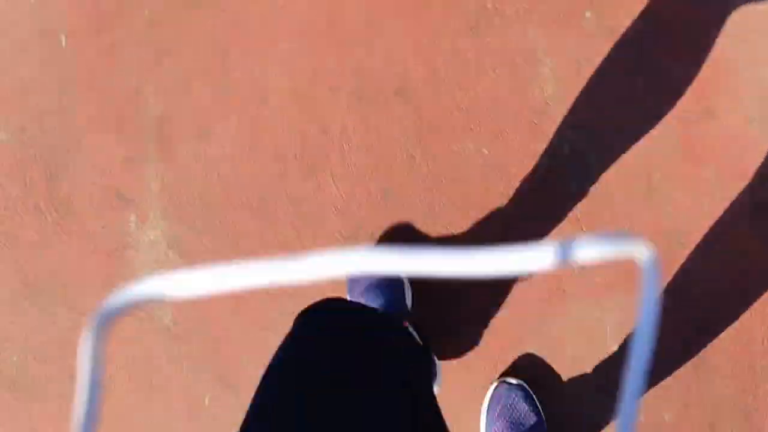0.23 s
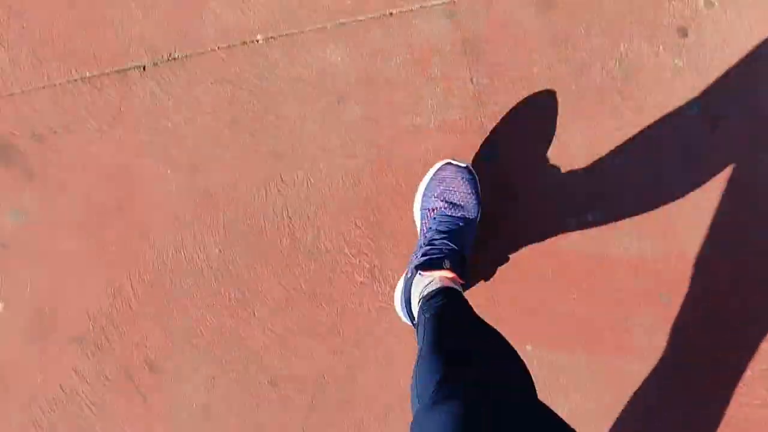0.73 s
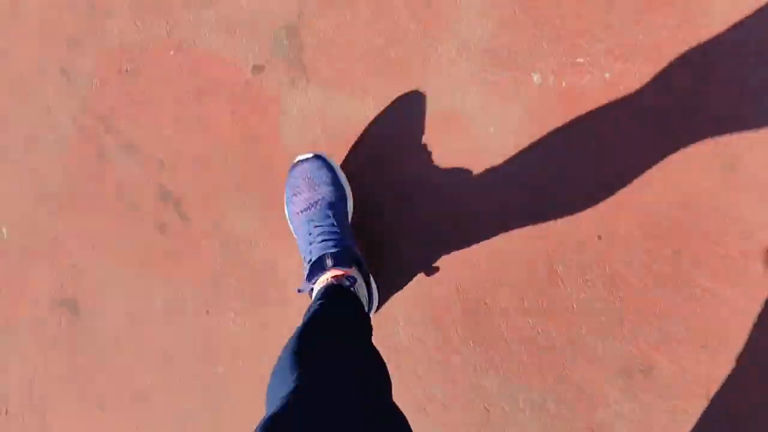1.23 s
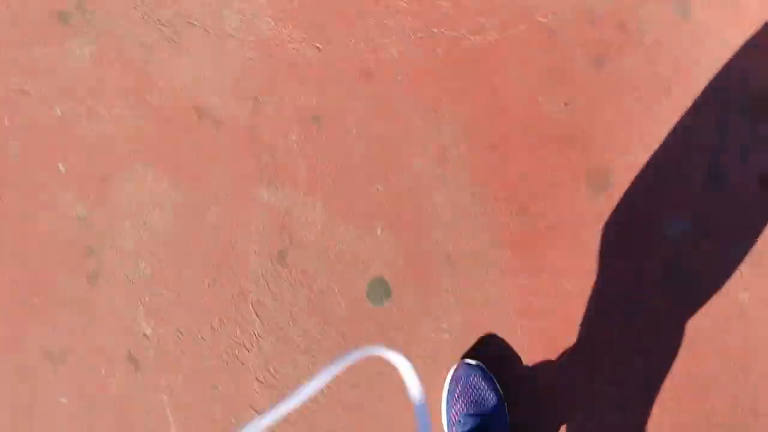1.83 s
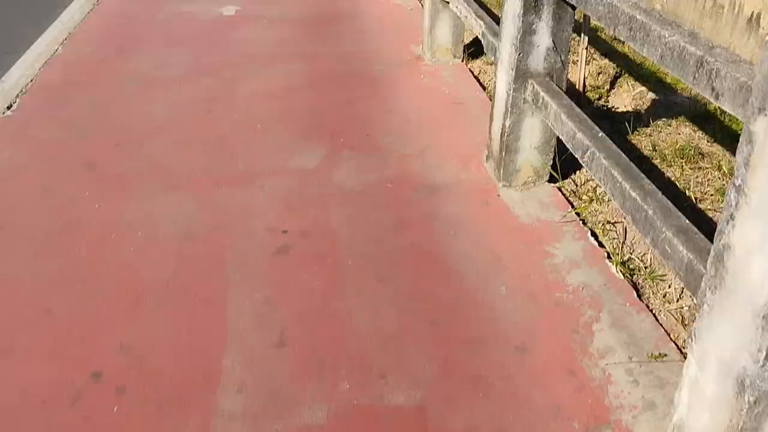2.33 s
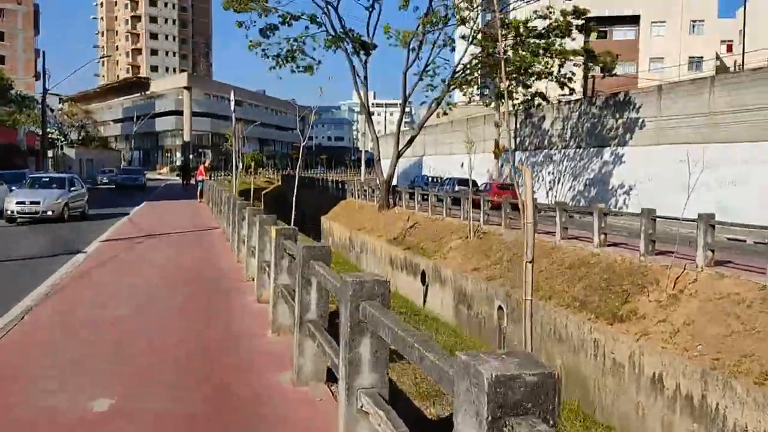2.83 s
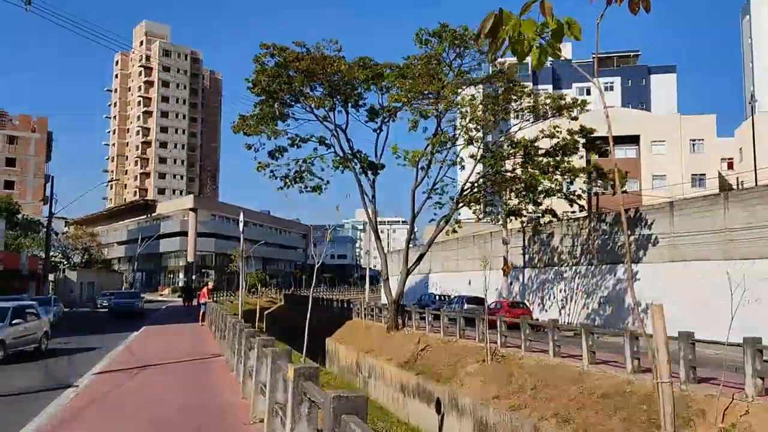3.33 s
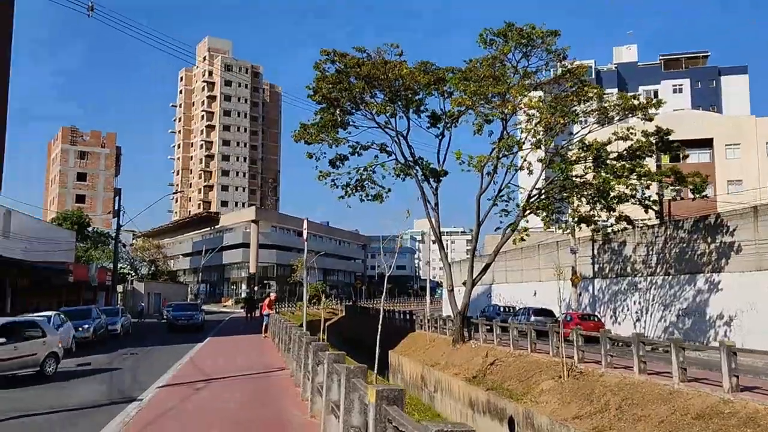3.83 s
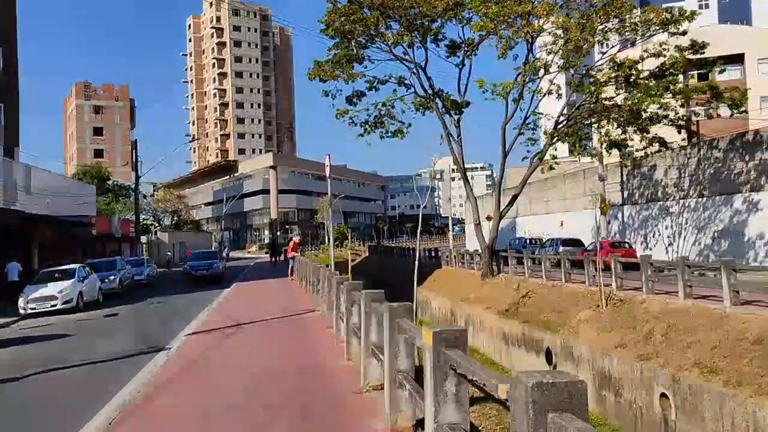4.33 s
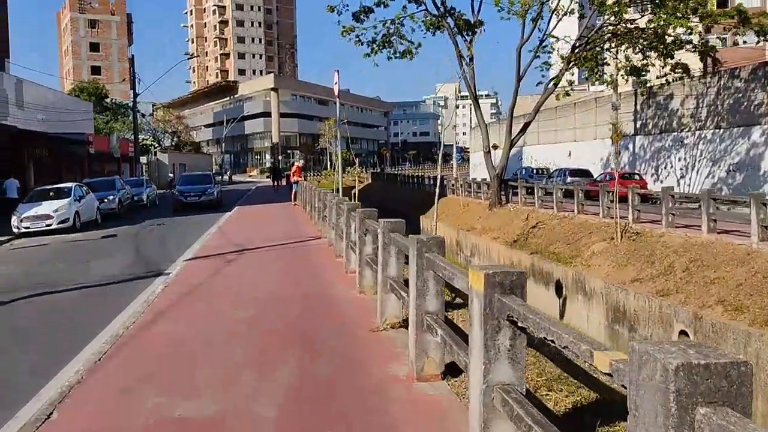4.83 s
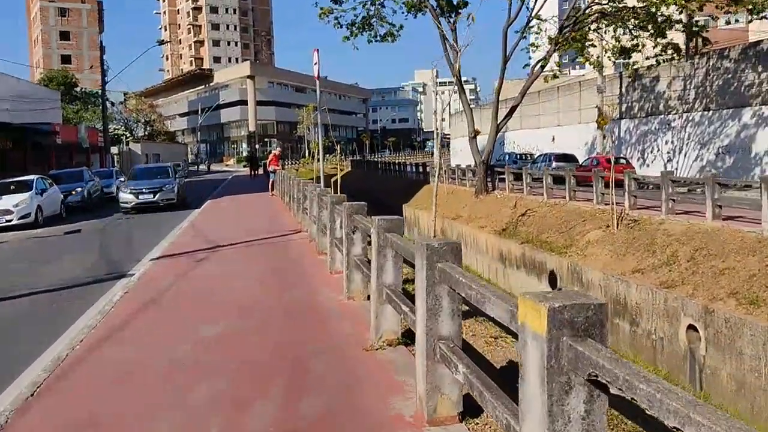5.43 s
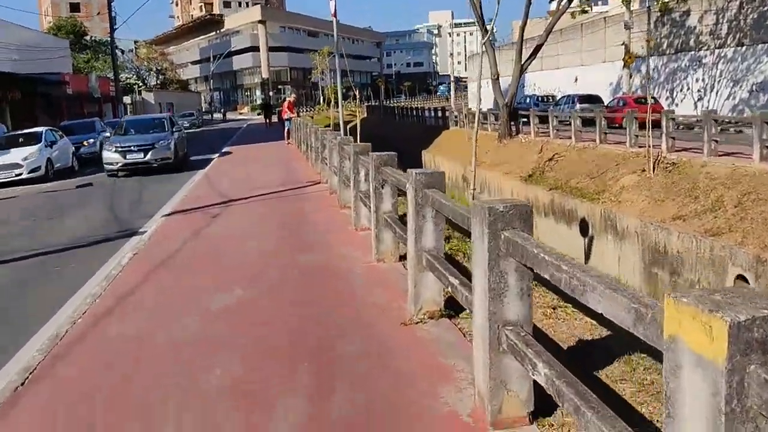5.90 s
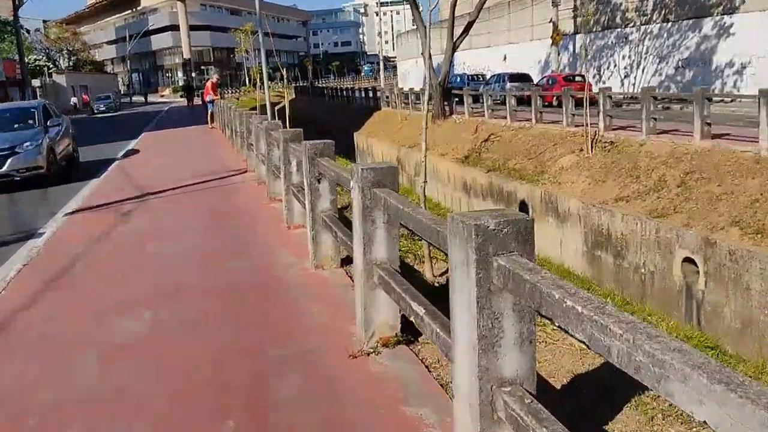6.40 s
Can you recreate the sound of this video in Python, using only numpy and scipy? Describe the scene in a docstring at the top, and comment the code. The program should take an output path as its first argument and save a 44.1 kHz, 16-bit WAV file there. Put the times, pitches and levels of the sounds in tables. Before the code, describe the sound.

Close, dry cloth rubs and tiny cord ticks sit over soft low wind and distant tyre hiss. Hurried bird chirps open the scene, then brief squeaks, dry clicks and a faint shoe scrape. A small metal piece rings once clearly; dull finger taps follow midway. Passing motors hum louder toward the end, joined by a pulsing, brake-like hoot echoing faintly off buildings. Single-channel handheld pickup outdoors.

```python
"""Light wind and distant traffic rumble under a rustle of clothes: a walk, phone in hand, on a paved path.
A bird twitters as gliding sines; a dangling cord ticks as short noise decays; far squeaks waver.
A small metal part rings, folds snap, dry clicks crackle, soles scuff as band noise, fingers bump the case.
Engine sines swell, loudest near the end, where a throbbing hoot, perhaps a brake, joins in.
Wind is coloured noise with pressure dips; sparse random taps echo the house fronts."""
import sys
import numpy as np
from scipy import signal
from scipy.fft import rfft, irfft
from scipy.io import wavfile
from scipy.ndimage import uniform_filter1d

SR = 44100
rng = np.random.default_rng(int(sys.argv[2]) if len(sys.argv) > 2 else 0)


def wav_record(signal):
    """Record a signal, one row per channel, as 16-bit PCM in the file named by sys.argv[1]."""
    frames = np.transpose(np.atleast_2d(signal))
    bounded = np.clip(frames, -1, 1)
    # unit amplitude maps onto the largest positive 16-bit level
    quanta = np.round(bounded * 32767).astype(np.int16)
    wavfile.write(sys.argv[1], SR, quanta)


N = 293706
TIME_S = np.arange(N) / SR

# Arm swing and stride
SWAY_DB, STRIDE_HZ = -19.3, 2.25
# Wind swells: (time [s], level before gain [dB])
WIND_LEVELS = [(0.05, -44), (0.17, -46.5), (0.3, -56), (0.66, -50), (0.85, -44), (0.99, -51), (1.1, -39),
               (1.22, -52), (1.44, -48), (1.6, -48.5), (1.9, -47), (2.03, -52), (2.2, -42), (2.43, -54),
               (2.6, -44.5), (2.82, -51), (3.07, -39), (3.3, -49), (3.66, -45.5), (3.98, -56), (4.15, -45),
               (4.34, -51), (4.5, -46.5), (4.68, -62), (4.85, -46), (5.0, -55), (5.2, -50), (5.5, -44),
               (5.7, -55), (5.87, -47), (6.15, -53), (6.6, -40.5)]
# Wind spectrum: (frequency [Hz], relative density [dB per Hz])
WIND_SPECTRUM = [(20, -6.5), (33, 3), (48, 2.5), (70, -1.5), (100, -10.5), (135, -15.5), (180, -20),
                 (400, -30)]
# Strongest eddies at the microphone port: (time [s], width [s], peak [dB])
EDDIES = [(0.818, 0.0028, -25), (0.829, 0.0024, -26), (0.853, 0.0035, -24), (0.867, 0.0014, -35),
          (0.9087, 0.003, -22.5), (1.084, 0.0026, -31), (1.132, 0.0027, -30.5), (2.918, 0.0031, -29.5),
          (3.048, 0.005, -37), (3.104, 0.004, -34), (3.193, 0.007, -33)]
# Road: (time [s], rumble before gain [dB], tyre hiss before gain [dB])
ROAD_LEVELS = [(0.05, -56.5, -56), (0.88, -56.5, -57), (1.22, -54.5, -55), (1.95, -57, -57),
               (2.6, -55.5, -55.5), (3.27, -55.5, -56), (3.7, -55.5, -54), (4.34, -55.5, -56.5),
               (4.9, -55.5, -54.5), (5.28, -53.5, -54.5), (5.78, -53.5, -52.5), (6.25, -50, -51),
               (6.45, -53.5, -50), (6.6, -47, -51.5)]
# Road rumble, tyres, distant motors, microphone hiss: (frequency [Hz], relative density [dB per Hz])
RUMBLE_SPECTRUM = [(130, -1), (220, -0.5), (350, -2), (550, -3.5), (680, -6), (830, -5.5), (1000, -7.5),
                   (1400, -10), (2200, -35)]
TYRE_SPECTRUM = [(1000, -16), (1300, -2.5), (1700, 7), (2100, 4.5), (2450, 3), (2800, -0.5), (3300, -4.5),
                 (4200, -11.5), (5400, -14), (6300, -22.5), (9000, -30)]
DRONE_SPECTRUM = [(50, -11), (65, -1.5), (95, -0.5), (135, -4.5), (180, -11)]
HISS_SPECTRUM = [(4000, -4), (7000, -0.5), (8000, -4), (9500, 3), (10300, -2), (12400, -1), (13600, 0),
                 (15500, 4)]
DRONE_DB, HISS_DB = -49.5, -69
# Engines: (loudest time [s], time from peak to 1/e [s], firing rate [Hz], peak level [dB])
ENGINE_PASSES = [(1.105, 0.86, 83.9, -63), (4.704, 0.41, 69.9, -45), (5.143, 0.45, 93.2, -51.5),
                 (6.278, 0.6, 54.2, -42.5)]
# Clothes rub as the legs pass: (start [s], nominal length [s], fizz [dB], body [dB])
CLOTH_RUBS = [(0.04, 0.029, -50.5, -45), (0.466, 0.1, -61, -59.5), (0.658, 0.024, -60.5, -55),
              (0.913, 0.031, -60, -56), (0.941, 0.023, -52, -47), (1.32, 0.014, -56, -48),
              (1.384, 0.077, -60, -58), (1.558, 0.028, -59, -59), (1.804, 0.054, -58, -52),
              (2.204, 0.022, -58.5, -56), (2.276, 0.071, -57.5, -50), (2.43, 0.03, -58, -56),
              (2.692, 0.03, -54, -48.5), (3.045, 0.046, -58, -53.5), (3.139, 0.085, -54.5, -48.5),
              (3.578, 0.065, -65.5, -56.5), (3.966, 0.033, -54, -55.5), (4.037, 0.035, -68, -67),
              (4.062, 0.064, -53.5, -49.5), (4.2, 0.016, -57.5, -52.5), (4.456, 0.04, -62, -60),
              (4.481, 0.027, -55.5, -47), (4.863, 0.031, -53.5, -55.5), (4.946, 0.077, -56, -56),
              (5.106, 0.012, -56.5, -52), (5.352, 0.032, -69, -64), (5.377, 0.039, -57.5, -49),
              (5.748, 0.035, -49.5, -48), (5.829, 0.045, -53, -49.5), (5.879, 0.025, -52.5, -53.5),
              (5.984, 0.027, -57, -71), (6.256, 0.045, -54.5, -51), (6.62, 0.047, -48.5, -46.5)]
# Cloth treble fizz and darker body: (frequency [Hz], relative density [dB per Hz])
FIZZ_SPECTRUM = [(4200, -29), (5400, -22), (6400, -8), (7700, -7), (8300, -0.5), (8750, -8.5), (9200, -1),
                 (10200, -9.5), (11200, 0), (12400, 2.5), (14000, -1), (15700, -1)]
BODY_SPECTRUM = [(1200, -6), (1950, -14), (2400, 10), (2900, -1), (3500, -1), (4300, -23), (5400, -4.5),
                 (6400, -49), (8400, -14.5), (10000, -18)]
# Bird notes: (start [s], length [s], first pitch [Hz], last pitch [Hz], level before gain [dB])
BIRD_NOTES = [(0.197, 0.024, 4100, 3560, -58), (0.205, 0.02, 3030, 2870, -53),
              (0.253, 0.03, 3140, 2650, -52), (0.282, 0.053, 3260, 2480, -50),
              (0.328, 0.016, 3500, 4800, -62), (0.345, 0.02, 5100, 3430, -55.5),
              (0.36, 0.021, 3550, 3270, -57.5), (0.393, 0.016, 5270, 3600, -57),
              (0.407, 0.028, 3480, 2830, -54), (0.455, 0.0375, 3290, 2560, -54),
              (0.466, 0.012, 3520, 5000, -61), (0.485, 0.026, 5100, 3330, -56),
              (0.495, 0.021, 3550, 3240, -53), (0.53, 0.016, 3070, 4200, -56),
              (0.573, 0.021, 3510, 2940, -53), (0.617, 0.0166, 4820, 3470, -54),
              (0.625, 0.021, 3600, 3230, -54), (0.658, 0.016, 4700, 3380, -61),
              (0.67, 0.021, 3640, 3050, -54), (0.71, 0.042, 3380, 2800, -52),
              (0.745, 0.025, 5170, 3280, -56), (0.825, 0.03, 3060, 2540, -51.5),
              (0.874, 0.027, 3020, 2590, -56)]
FLICK_ABOVE_HZ = 4400
# Cord ticks on the clothes: (time [s], relative level [dB])
CORD_TICKS = [(0.343, -37), (0.383, -40), (0.39, -34), (0.478, -34), (0.9457, -37), (1.3284, -28),
              (1.532, -38), (2.2089, -35), (2.577, -32), (2.6963, -28.5), (3.128, -40), (3.144, -31),
              (3.367, -43), (3.4107, -27), (3.478, -37), (3.561, -43), (3.949, -49), (4.4852, -31),
              (4.9796, -26), (5.7195, -30), (5.8341, -29), (5.958, -40)]
# Cord drags: (start [s], length [s], relative level [dB])
CORD_DRAGS = [(0.34, 0.14, -57.5), (0.48, 0.082, -60), (1.225, 0.072, -52), (2.49, 0.11, -57.5),
              (3.35, 0.14, -58), (4.77, 0.09, -60), (5.22, 0.083, -55.5)]
# Resonances colouring the cord noise: (frequency [Hz], relative gain [dB], t60 [s])
CORD_MODES = [(8800, -17, 0.0041), (12000, -6, 0.0017), (12480, 0, 0.004), (14200, -3, 0.0029),
              (14500, -4, 0.0056)]
# Far squeaks: (start [s], length [s], mid pitch [Hz], glide [Hz/s], direct level [dB])
FAR_SQUEAKS = [(1.012, 0.021, 1395, 0, -58), (1.2, 0.062, 1385, -450, -51),
               (1.052, 0.065, 1600, 996, -53.5), (1.03, 0.025, 2000, -500, -55),
               (0.72, 0.038, 2350, -500, -56), (1.4, 0.026, 2080, -400, -50),
               (1.185, 0.045, 1600, -400, -57), (1.212, 0.025, 1900, 398, -55)]
# Small metal piece, like a zip pull: (time [s], relative level [dB])
METAL_CLINKS = [(0.9455, -51), (2.269, -34.5), (4.495, -55)]
# Its modes, then a close pair that lingers: (frequency [Hz], relative gain [dB], t60 [s])
METAL_MODES = [(2200, -4, 0.05), (2430, 2, 0.03), (2540, 2, 0.025), (2704, 8.5, 0.062), (2930, -3, 0.03),
               (3370, -8, .02), (5020, -10.5, 0.04), (5600, -9, .02)]
METAL_TAIL = [(2699, -17, .9), (2683, -25, .9)]
# Cloth folds snap: (time [s], relative level [dB])
FOLD_SNAPS = [(0.947, -36.5), (2.7005, -37.5), (4.094, -38), (4.11, -39), (4.122, -38), (4.499, -40),
              (5.112, -50), (5.762, -39), (5.857, -38), (6.279, -35)]
# Fold resonances: (frequency [Hz], relative gain [dB], t60 [s])
FOLD_MODES = [(2355, 3.5, 0.012), (2585, -1.5, 0.017), (2900, -2, 0.011), (3540, -6.5, 0.0069),
              (5400, -11, 0.011)]
# Dry clicks: (time [s], impulse level before band-pass [dB])
DRY_CLICKS = [(0.978, -33), (0.996, -33), (1.005, -34), (1.016, -33), (1.0305, -32), (1.047, -34),
              (1.1, -34), (1.864, -39), (1.873, -41), (1.884, -29), (1.902, -35), (1.912, -36),
              (1.922, -39)]
# Sole scuffs: (start [s], length [s], centre [Hz], width [octaves], level [dB])
SOLE_SCUFFS = [(1.026, 0.33, 1990, 0.53, -56), (1.163, 0.068, 2040, 1.3, -52.5),
               (1.666, 0.069, 2080, 0.56, -55), (2.09, 0.045, 2800, 0.99, -53),
               (3.604, 0.17, 2070, 0.83, -56.5), (3.692, 0.0143, 1790, 0.5, -44),
               (3.716, 0.015, 2150, 0.77, -52), (5.647, 0.018, 3850, 0.85, -57.5)]
# Finger bumps: (time before lag [s], peak before gain [dB])
FINGER_BUMPS = [(3.402, -32), (3.443, -39.5), (3.479, -39.5), (3.557, -35.5), (3.627, -30.5),
                (3.705, -37.5), (3.836, -39), (3.872, -37)]
# Hoots: (start [s], length [s], base pitch at start [Hz], base level at start [dB])
HOOT_NOTES = [(6.25, 0.19, 547, -39), (6.481, 0.084, 540.5, -42), (6.613, 0.0213, 535, -45)]
# Hoot partials: (frequency multiple [ratio], relative level [dB])
HOOT_HARMONICS = [(1, -2.5), (2, -20), (3, -16.5)]
THROB_HZ, THROB_DB, THROB_BEND_RATIO = 18.5, 4, 0.034
HOOT_FADE_DB_PER_S, HOOT_RISE_HZ_PER_S = 17, 131
# House-front echoes
STREET_DELAY_S, STREET_T60_S, STREET_ECHOES_PER_S = 0.026, 0.42, 200
CUTOFF_HZ = 16000


def from_db(db):
    """Decibels to amplitude gain."""
    return 10 ** (np.asarray(db) / 20)


def rms_one(x):
    """Scale to unit power."""
    return x / np.sqrt(np.mean(x ** 2) + 1e-20)


def in_time(rows):
    """Interpolate each level column over time."""
    time_s, *columns = np.transpose(rows)
    return [np.interp(TIME_S, time_s, column) for column in columns]


def band(x, low_hz, high_hz):
    """Causal Butterworth band-pass."""
    sos = signal.butter(2, [low_hz, min(high_hz, .45 * SR)], "band", fs=SR, output="sos")
    return signal.sosfilt(sos, x + 1e-18)


def drift(rate_hz):
    """Random wander of about unit power: two-pole low-passed noise, computed at SR / 20."""
    r = np.exp(-40 * np.pi * rate_hz / SR)
    white = rng.standard_normal(N // 20 + 4002)
    slow = signal.lfilter([1], [1, -2 * r, r * r], white)[4000:]  # drop the filter's settling
    return np.interp(np.arange(N) / 20, np.arange(len(slow)), rms_one(slow))


def noise(spectrum, grain_db=0):
    """Unit-power coloured noise, 30 dB/octave steeper beyond the ends; grain_db roughens its level."""
    hz, db = np.transpose(spectrum)
    octave = np.log2(np.arange(N // 2 + 1) * SR / N + 0.0013)
    knots = np.log2(hz)
    outside = np.abs(octave - np.clip(octave, knots[0], knots[-1]))
    colour_db = np.interp(octave, knots, db) - 30 * outside
    white = rng.standard_normal(N) * from_db(grain_db * drift(760))
    return rms_one(irfft(rfft(white) * from_db(colour_db), N))


def swell(start_s, length_s, edge=0.48):
    """Smoothstep envelope, half gain at start and end; each fade lasts edge * length."""
    inside = np.minimum(TIME_S - start_s, start_s + length_s - TIME_S) / (length_s * edge)
    u = np.clip(inside + .5, 0, 1)
    return u ** 2 * (3 - 2 * u)


def strikes(rows, spread_db=0):
    """One impulse per (time [s], level [dB]) row, with random level spread."""
    time_s, db = np.transpose(rows)
    out = np.zeros(N)
    at = np.clip((time_s * SR).astype(int), 0, N - 1)
    out[at] = from_db(db + spread_db * rng.standard_normal(len(time_s)))
    return out


def ring(clicks, modes):
    """Drive a bank of damped sine resonators."""
    out = 0
    for hz, db, t60_s in modes:
        r = from_db(-60 / (t60_s * SR))
        w = 2 * np.pi * hz / SR
        poles = [1, -2 * r * np.cos(w), r * r]
        out = out + signal.lfilter([0, from_db(db) * np.sin(w)], poles, clicks + 1e-18)
    return out


def with_echoes(x, echo_db):
    """Direct sound plus a decaying random scatter of reflections from the house fronts."""
    age_s = np.arange(SR // 2) / SR
    taps = (rng.random(len(age_s)) < STREET_ECHOES_PER_S / SR) * rng.standard_normal(len(age_s))
    taps *= (age_s > STREET_DELAY_S) * from_db(-60 * age_s / STREET_T60_S)
    taps = taps / (np.linalg.norm(taps) + 1e-9)
    return x + from_db(echo_db) * signal.oaconvolve(x, taps)[:N]


def sway(slow_db=-2, flutter_db=-11, wander_rad=1.0):
    """Pressure heaves at the stride rate plus very low noise, mostly below hearing."""
    stride = np.sqrt(2) * np.sin(2 * np.pi * STRIDE_HZ * TIME_S + wander_rad * drift(0.82))
    lean = noise([(.7, 0), (1.3, -1), (3.3, 0), (5, -9)])
    flutter = noise([(4, 0), (7, -3), (10, -10), (15, -16), (22, -24)])
    return from_db(SWAY_DB) * rms_one(stride + from_db(slow_db) * lean + from_db(flutter_db) * flutter)


def eddy(centre_s, width_s):
    """Low pressure inside a rim of high pressure."""
    u = np.clip((TIME_S - centre_s) / width_s, -10, 10)
    return (u ** 2 - 1) * np.exp(-u ** 2 / 2)


def wind(lumpy_db=2.5, gain_db=2.0, shed_s=0.01262, shed_db=-11, shed_loss_db=4, shed_size=0.52, count=3):
    """Lumpy low rumble; single eddies suck at the port, each followed by smaller shed ones."""
    level_db, = in_time(WIND_LEVELS)
    out = from_db(level_db + gain_db + lumpy_db * drift(16.0)) * noise(WIND_SPECTRUM)
    for time_s, width_s, peak_db in EDDIES:
        out += from_db(peak_db) * eddy(time_s, width_s)
        delays_s = np.cumsum(shed_s * rng.uniform(0.694, 1.264, count))
        for k, delay_s in enumerate(delays_s):
            small_db = peak_db + shed_db - shed_loss_db * k
            out += from_db(small_db) * eddy(time_s + delay_s, width_s * shed_size)
    return out


def road(rumble_gain_db=2.5, tyre_gain_db=1.0, waver_db=2.0, tyre_waver_db=1.56):
    """Far traffic is coloured noise; nearer engines add a firing note and its octave."""
    rumble_db, tyre_db = in_time(ROAD_LEVELS)
    out = from_db(rumble_db + rumble_gain_db + waver_db * drift(17.0)) * noise(RUMBLE_SPECTRUM)
    out += from_db(tyre_db + tyre_gain_db + tyre_waver_db * drift(24)) * noise(TYRE_SPECTRUM)
    out += from_db(DRONE_DB) * noise(DRONE_SPECTRUM)
    for peak_s, half_s, firing_hz, db in ENGINE_PASSES:
        phase = 2 * np.pi * np.cumsum(firing_hz * (1 + 0.0183 * drift(3.7))) / SR
        tone = np.sqrt(2) * (np.sin(phase) + 0.062 * np.sin(2 * phase))
        out += from_db(db) * np.exp(-((TIME_S - peak_s) / half_s) ** 2) * tone
    return out


def rub_levels(release_s=0.0015, slow_rub_s=0.15, overrun=1.23, fizz_skirt_db=-11, body_skirt_db=-14,
               lead_s=0.013):
    """Fizz and body gains: short rubs snap and fade, long ones swell; fizz leads, body trails."""
    fizz = body = 0
    for start_s, length_s, fizz_db, body_db in CLOTH_RUBS:
        rise_s = length_s * min(length_s / slow_rub_s, .5)
        ramp = np.interp(TIME_S - start_s, [0, rise_s, length_s * overrun], [0, 1, 0])
        stroke = np.sqrt(2) * ramp ** .7
        lead_in = from_db(fizz_skirt_db) * swell(start_s - length_s / 2 - lead_s, 2 * length_s)
        trail = from_db(body_skirt_db) * swell(start_s - length_s / 2 + lead_s, 2 * length_s)
        fizz = fizz + from_db(fizz_db) * np.hypot(stroke, lead_in)
        body = body + from_db(body_db) * np.hypot(stroke, trail)
    r = np.exp(-1 / (release_s * SR))
    return signal.lfilter([1 - r], [1, -r], np.array([fizz, body]) + 1e-18)


def cloth(stir_db=-76, stir_swing_db=5, judder_db=2.3, judder_hz=110, echo_db=-18):
    """Fibres catch and slip: grainy fizz over a juddering body, with a faint stir between rubs."""
    fizz, body = rub_levels()
    stir = from_db(stir_db + stir_swing_db * np.clip(drift(22), -2, 2))
    fizz = np.hypot(fizz, stir)
    catch = rms_one(from_db(1.8 * drift(190)))
    judder = rms_one(from_db(judder_db * np.clip(drift(judder_hz), -2, 2)))
    treble = catch * fizz * noise(FIZZ_SPECTRUM, grain_db=3.0)
    dark = catch * body * judder * noise(BODY_SPECTRUM, grain_db=3.0)
    return treble + with_echoes(dark, echo_db)


def whistle(start_s, length_s, first_hz, last_hz, flick_bend=0.64, slur_bend=1.33):
    """Trembling glide: high flicks move fast then slow, low slurs start slowly."""
    u = np.clip((TIME_S - start_s) / length_s, 0, 1)
    on = (u > 0) & (u < 1)
    bend = flick_bend if max(first_hz, last_hz) > FLICK_ABOVE_HZ else slur_bend
    tremble = np.interp(u[on], np.linspace(0, 1, 9), rng.standard_normal(9))
    hz = first_hz * (last_hz / first_hz) ** (u[on] ** bend) * (1 + .022 * tremble)
    out = np.zeros(N)
    out[on] = np.sin(np.pi * u[on]) * np.sin(2 * np.pi * np.cumsum(hz) / SR)
    return out


def bird(gain_db=-0.5, echo_db=-4):
    """Hurried twitter of low slurs and steep flicks, blurred by street echoes."""
    out = 0
    for start_s, length_s, first_hz, last_hz, db in BIRD_NOTES:
        out = out + from_db(db + gain_db) * whistle(start_s, length_s, first_hz, last_hz)
    return with_echoes(out, echo_db)


def patter(runs, per_s):
    """Random clicks of uneven size during each (start [s], length [s], level [dB]) run."""
    level = sum(from_db(db) * swell(start_s, length_s, .2) for start_s, length_s, db in runs)
    born = rng.random(N) < per_s / SR
    return level * born * from_db(3 * np.clip(rng.standard_normal(N), -2, 2))


def cord(tick_db=-10.5, slip_s=0.0014, faint_per_s=35, faint_db=-62, drag_per_s=240, drag_db=-2):
    """Tiny slips gate resonant noise: set ticks, drag runs, and faint ones that follow the rubs."""
    motion = np.sqrt(np.abs(uniform_filter1d(rub_levels()[0], SR // 5)))
    born = rng.random(N) < faint_per_s * motion / motion.mean() / SR
    faint = born * from_db(faint_db + 4 * np.clip(rng.standard_normal(N), -2, 2))
    ticks = from_db(tick_db) * strikes(CORD_TICKS)
    drags = from_db(drag_db) * patter(CORD_DRAGS, drag_per_s)
    clicks = ticks + drags + faint
    slips = signal.lfilter([1], [1, -np.exp(-1 / (slip_s * SR))], clicks + 1e-18)
    return slips * rms_one(ring(rng.standard_normal(N), CORD_MODES))


def squeaks(waver=0.0082, echo_db=-5):
    """Short wavering sines from down the road, gliding in pitch and trailing echoes."""
    out = 0
    for start_s, length_s, mid_hz, glide_hz_per_s, db in FAR_SQUEAKS:
        from_mid_s = np.clip(TIME_S - start_s - length_s / 2, -length_s, length_s)
        hz = mid_hz * (1 + waver * drift(64)) + glide_hz_per_s * from_mid_s
        tone = np.sqrt(2) * np.sin(2 * np.pi * np.cumsum(hz) / SR)
        out = out + from_db(db) * swell(start_s, length_s) * tone
    return with_echoes(out, echo_db)


def clink(chatter_s=0.032, low_hz=1300, top_hz=6000, chatter_db=-10, ring_db=4.0, build_s=0.024, echo_db=-16):
    """Metal chatters while its modes build up, then a thin note lingers; small metal radiates no bass."""
    u = np.linspace(0, 1, int(chatter_s * SR))
    chatter = np.sin(np.pi * np.sqrt(u)) * rng.standard_normal(len(u))
    first = strikes(METAL_CLINKS)
    touches = from_db(chatter_db) * signal.oaconvolve(first, chatter / np.linalg.norm(chatter))[:N]
    # subtracting a faster decay gives a gradual attack
    fast_modes = [(hz, db, min(build_s, t60_s / 2)) for hz, db, t60_s in METAL_MODES]
    note = ring(first, METAL_MODES) - ring(first, fast_modes)
    metal = from_db(ring_db) * note + ring(touches, METAL_MODES) + ring(first, METAL_TAIL)
    return with_echoes(band(metal, low_hz, top_hz), echo_db)


def snaps(gain_db=-0.5, slip_s=0.0078, low_hz=2000, top_hz=5600):
    """Folds let go in quick rough slips: one random push per mode serves all snaps; levels vary."""
    slip = np.hanning(int(slip_s * SR))
    slip_time_s = np.arange(len(slip)) / SR
    out = 0
    for hz, db, t60_s in FOLD_MODES:
        rough = slip * (1 + rng.standard_normal(len(slip)))
        push = rough * np.cos(2 * np.pi * hz * slip_time_s) * 2 / slip.sum()
        pushes = signal.oaconvolve(strikes(FOLD_SNAPS, spread_db=1.5), push)[:N]
        out = out + ring(pushes, [(hz, db, t60_s)])
    return from_db(gain_db) * band(out, low_hz, top_hz)


def crackle(low_hz=3200, high_hz=12000):
    """Thin, dry clicks: band-passed impulses without resonant modes."""
    return band(strikes(DRY_CLICKS), low_hz, high_hz)


def shoes():
    """Soft soles drag over grit: short bursts of uneven band noise."""
    grit = rng.standard_normal(N) * from_db(2.5 * drift(300))
    out = 0
    for start_s, length_s, centre_hz, octaves, db in SOLE_SCUFFS:
        half = 2 ** (max(octaves, .1) / 2)
        scrape = rms_one(band(grit, centre_hz / half, centre_hz * half))
        out = out + from_db(db) * swell(start_s, length_s, edge=0.18) * scrape
    return out


def fingers(bump_db=7.0, soft_s=0.00078, lag_s=0.00519):
    """A fingertip on the case gives one soft, one-sided, critically damped push."""
    r = np.exp(-1 / (soft_s * SR))
    pushes = strikes([(time_s + lag_s, db + bump_db) for time_s, db in FINGER_BUMPS])
    # e scales the response to unit peak
    return signal.lfilter([0, np.e / (soft_s * SR)], [1, -2 * r, r * r], pushes + 1e-18)


def hoot(first_throb_s=0.018, edge=0.16, echo_db=-14):
    """Hollow harmonic tone that throbs, fades and rises; pitch dips on each strong beat."""
    out = 0
    for start_s, length_s, pitch_hz, db in HOOT_NOTES:
        age_s = np.clip(TIME_S - start_s, 0, length_s)
        throb = np.cos(2 * np.pi * THROB_HZ * (age_s - first_throb_s))
        hz = (pitch_hz + HOOT_RISE_HZ_PER_S * age_s) * (1 - THROB_BEND_RATIO * throb)
        phase = 2 * np.pi * np.cumsum(hz * (1 + .016 * drift(60))) / SR
        tone = sum(from_db(part_db) * np.sin(round(k) * phase) for k, part_db in HOOT_HARMONICS)
        level_db = db + THROB_DB * throb - HOOT_FADE_DB_PER_S * age_s
        out = out + from_db(level_db) * swell(start_s, length_s, edge) * np.sqrt(2) * tone
    return with_echoes(out, echo_db)


def scene():
    """Sum air, street, walker and microphone hiss into one channel."""
    air = sway() + wind()
    street = road() + bird() + squeaks() + hoot()
    walker = cloth() + cord() + clink() + snaps() + crackle() + shoes() + fingers()
    hiss = from_db(HISS_DB) * noise(HISS_SPECTRUM)
    return (air + street + walker + hiss)[None]


def record(dry):
    """Steep elliptic low-pass at the top of the band."""
    lead_in = np.pad(dry, ((0, 0), (2000, 0)), mode="edge")  # lets the filter settle
    sos = signal.ellip(12, .1, 90, CUTOFF_HZ, fs=SR, output="sos")
    return signal.sosfilt(sos, lead_in)[:, -N:]


dry = scene()
out = record(dry)
wav_record(out)
```